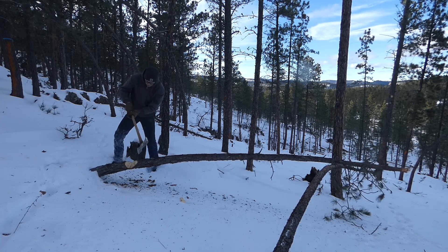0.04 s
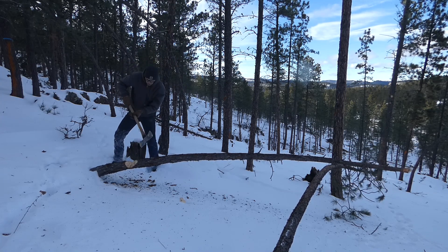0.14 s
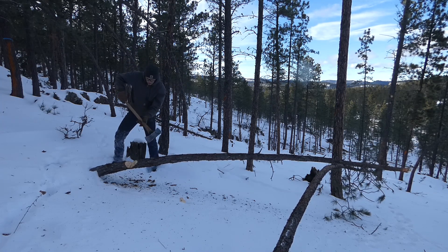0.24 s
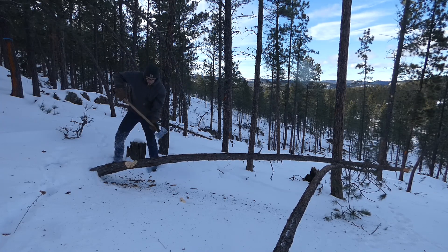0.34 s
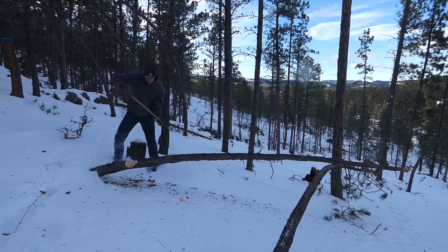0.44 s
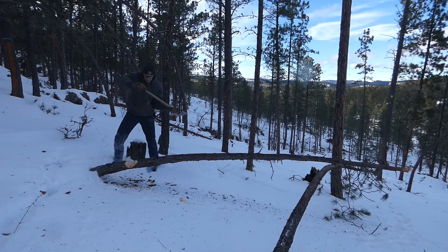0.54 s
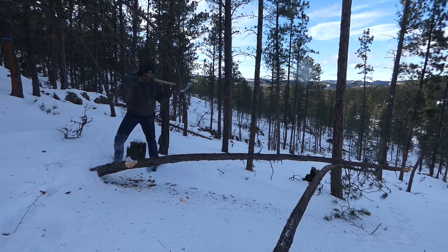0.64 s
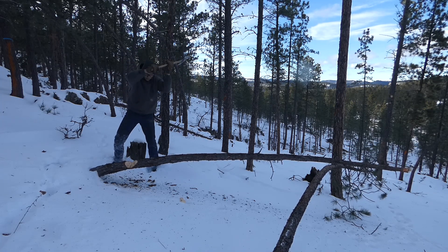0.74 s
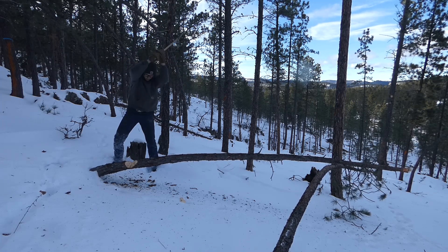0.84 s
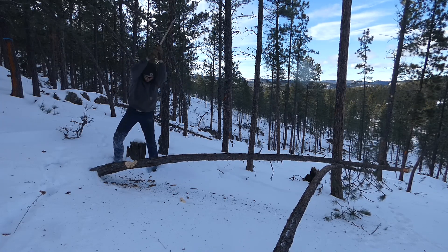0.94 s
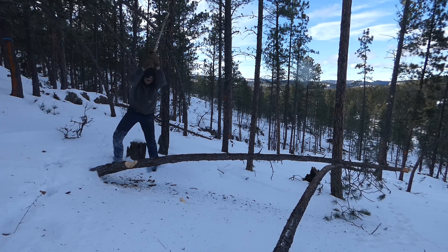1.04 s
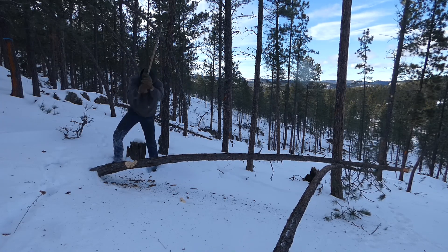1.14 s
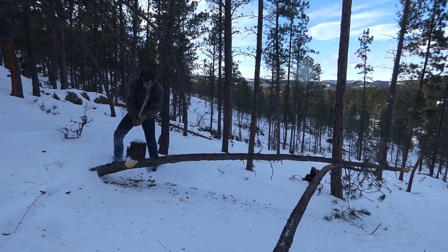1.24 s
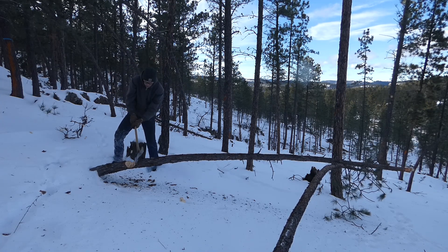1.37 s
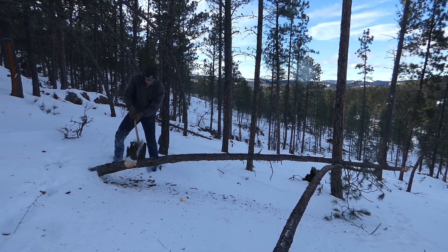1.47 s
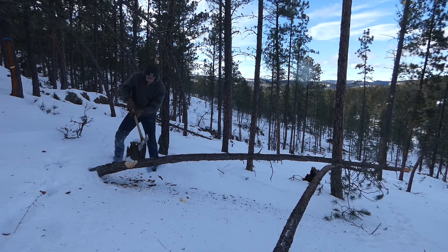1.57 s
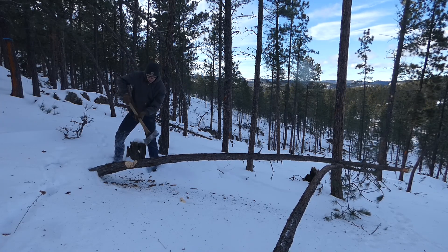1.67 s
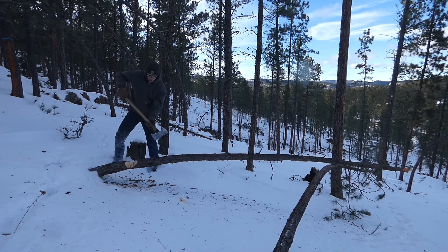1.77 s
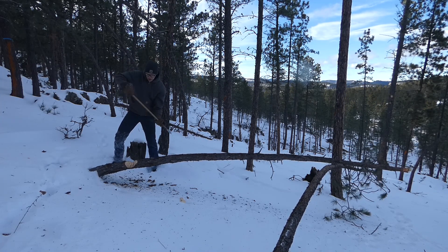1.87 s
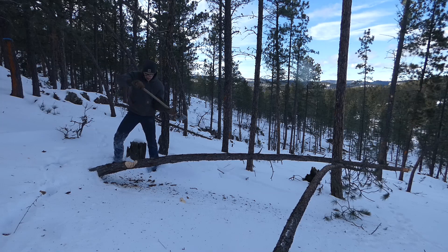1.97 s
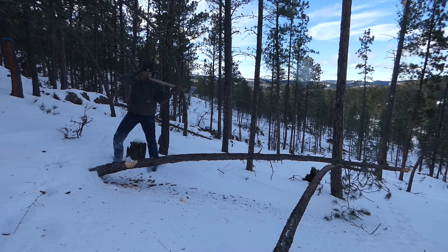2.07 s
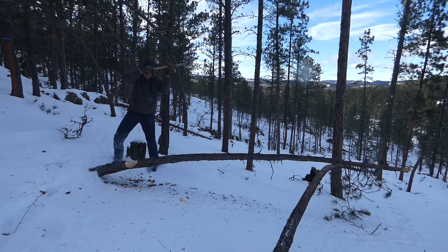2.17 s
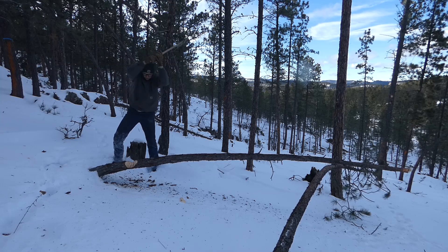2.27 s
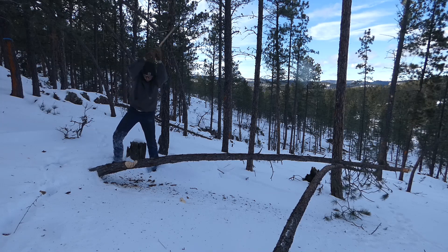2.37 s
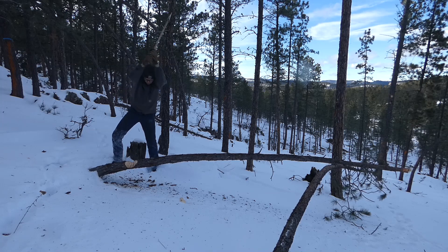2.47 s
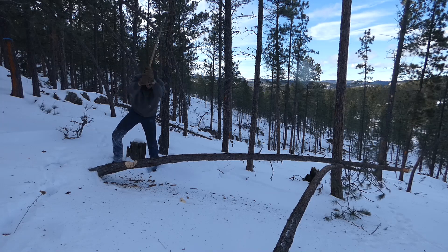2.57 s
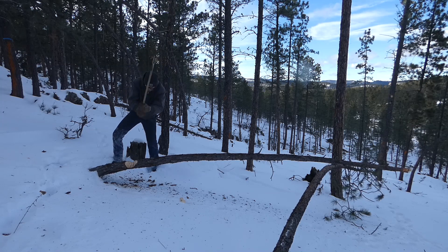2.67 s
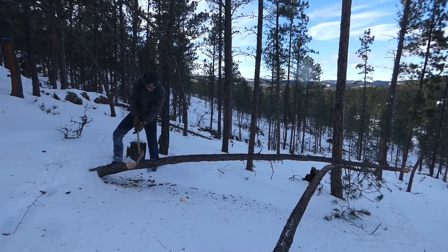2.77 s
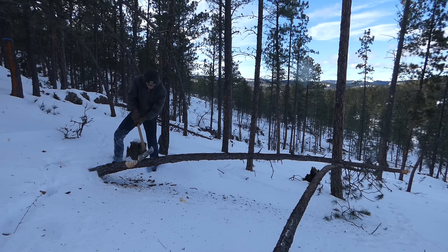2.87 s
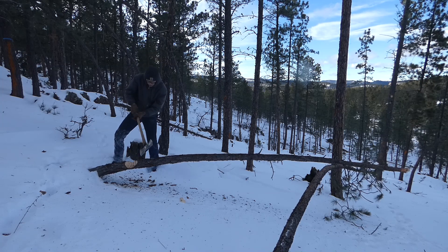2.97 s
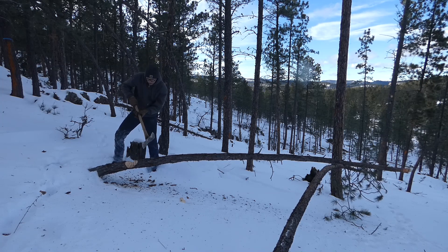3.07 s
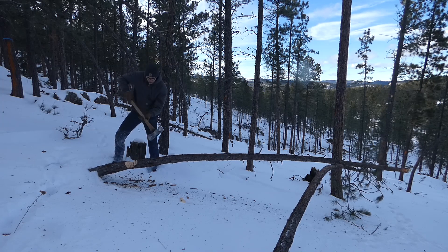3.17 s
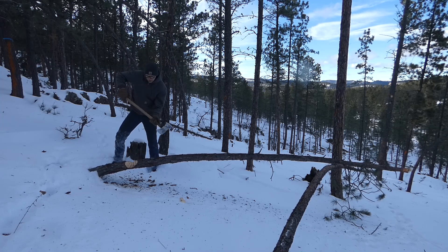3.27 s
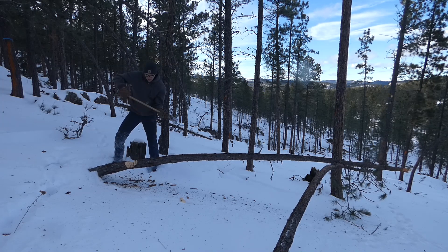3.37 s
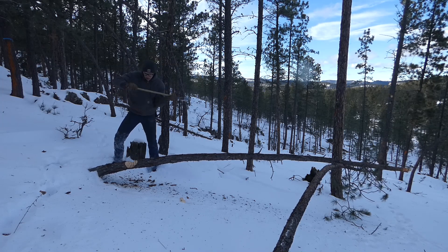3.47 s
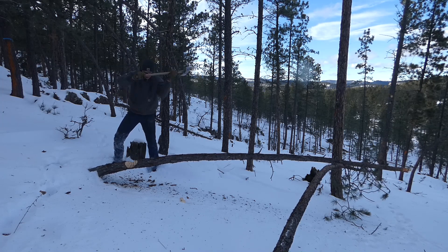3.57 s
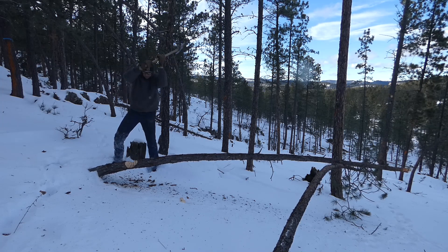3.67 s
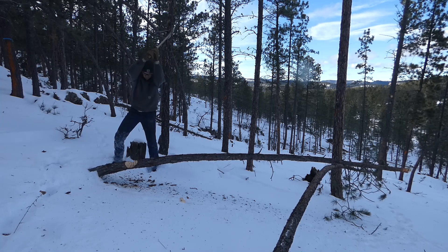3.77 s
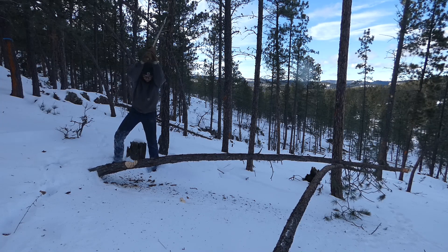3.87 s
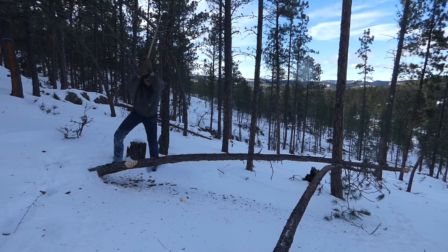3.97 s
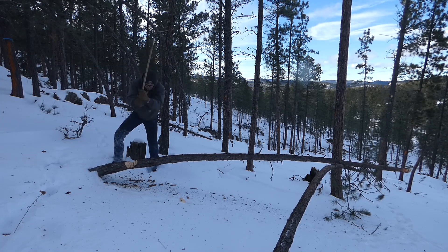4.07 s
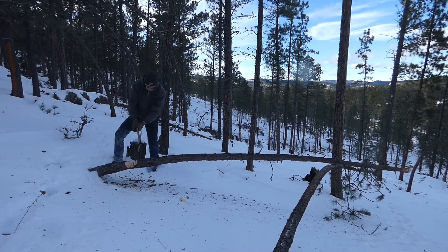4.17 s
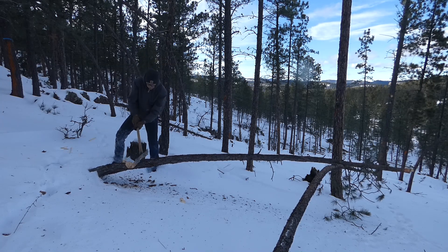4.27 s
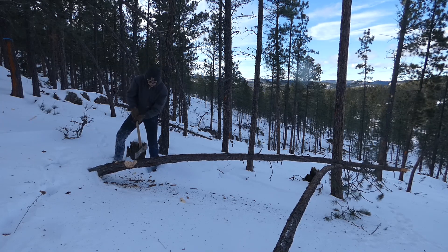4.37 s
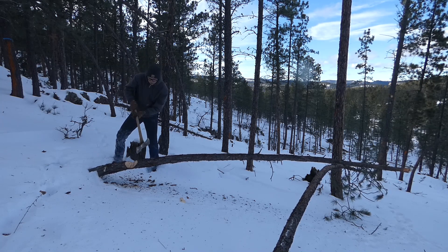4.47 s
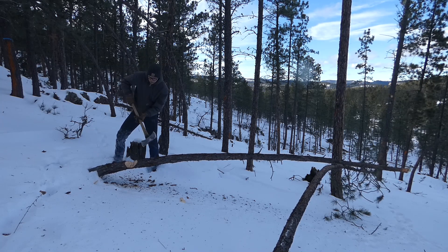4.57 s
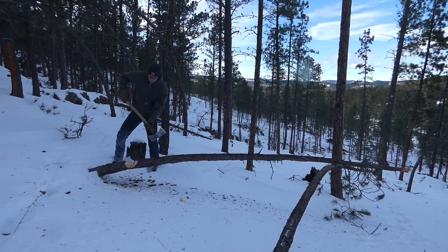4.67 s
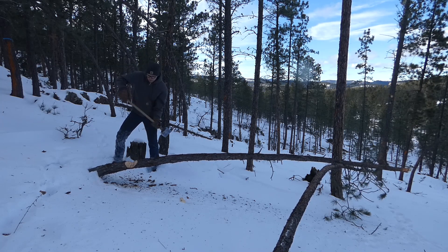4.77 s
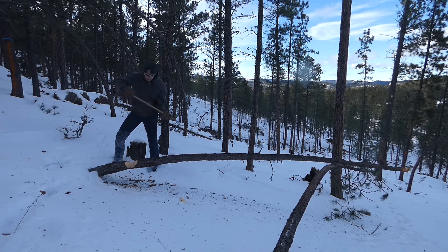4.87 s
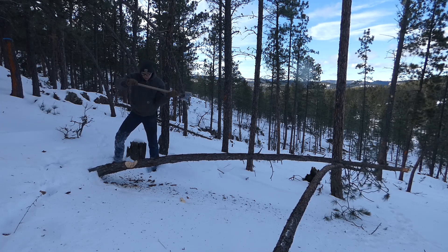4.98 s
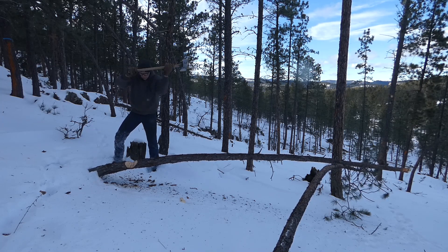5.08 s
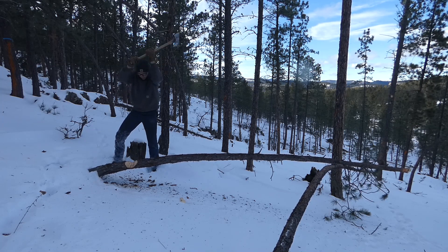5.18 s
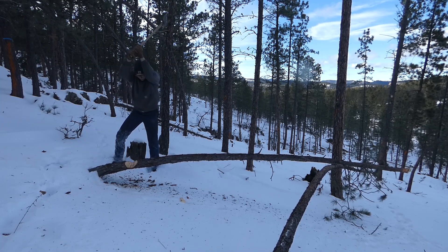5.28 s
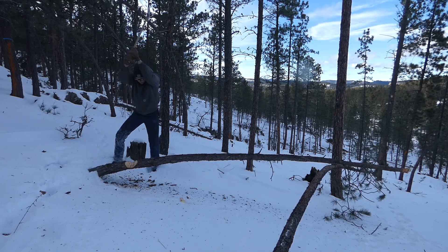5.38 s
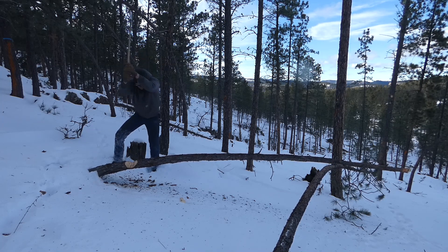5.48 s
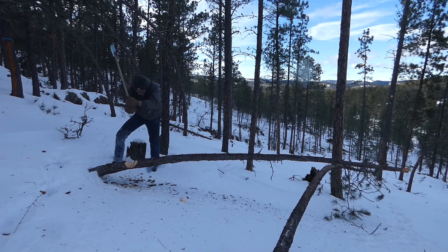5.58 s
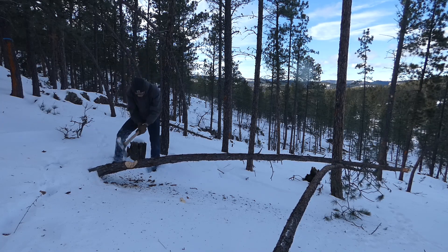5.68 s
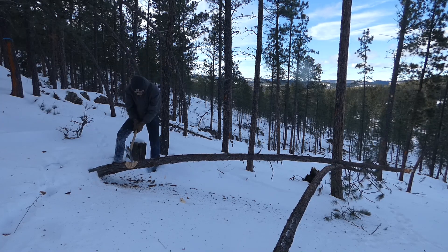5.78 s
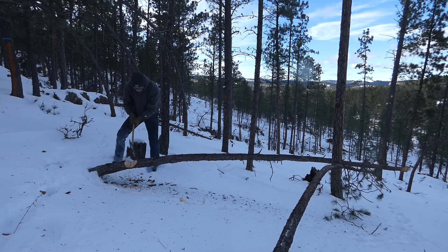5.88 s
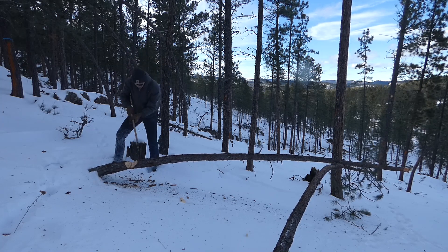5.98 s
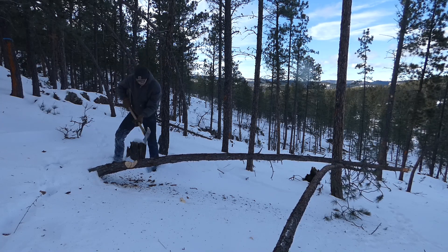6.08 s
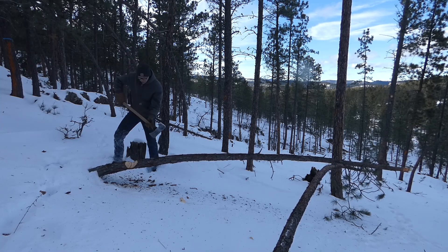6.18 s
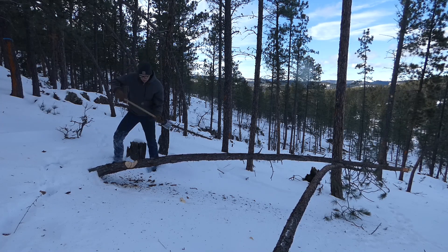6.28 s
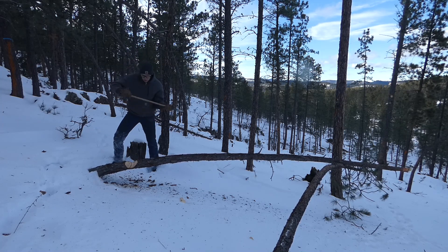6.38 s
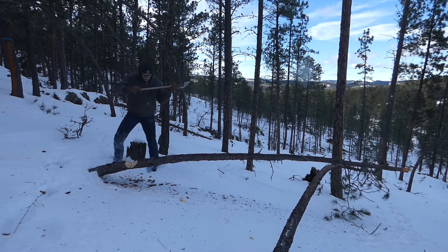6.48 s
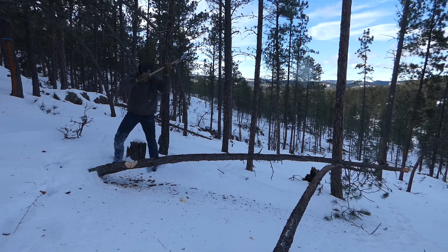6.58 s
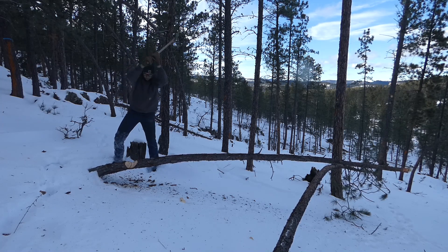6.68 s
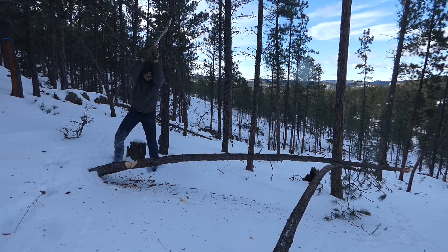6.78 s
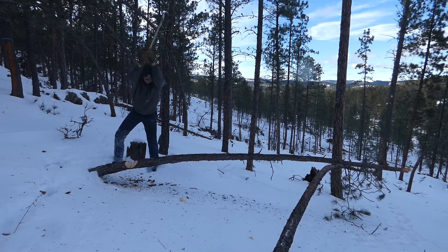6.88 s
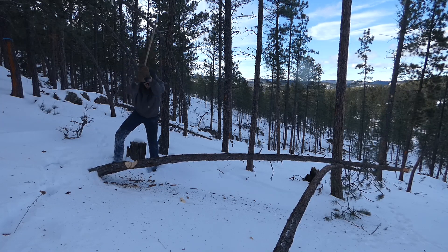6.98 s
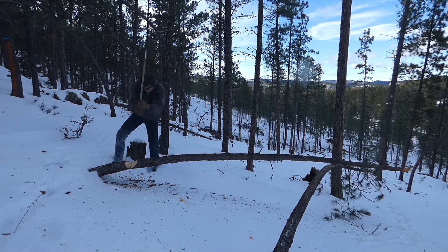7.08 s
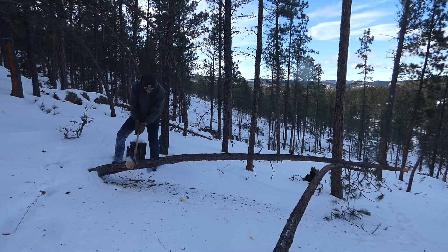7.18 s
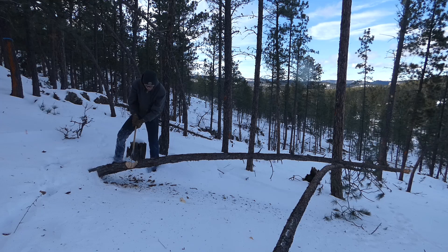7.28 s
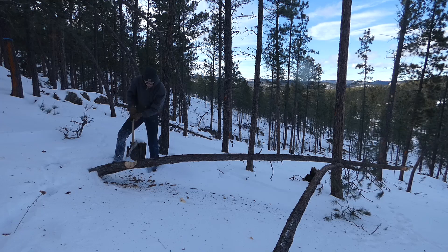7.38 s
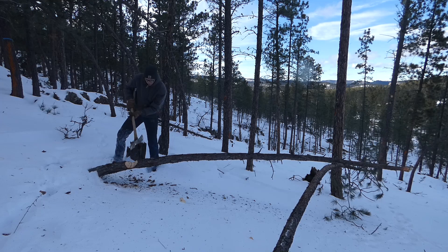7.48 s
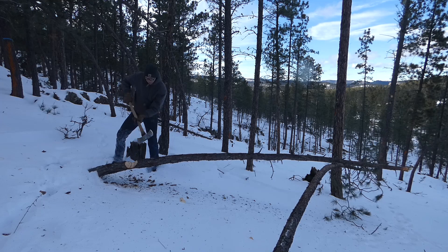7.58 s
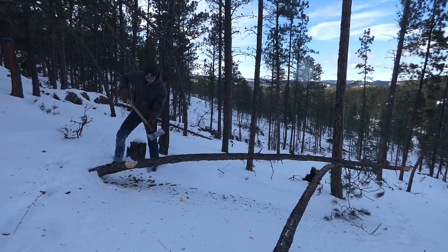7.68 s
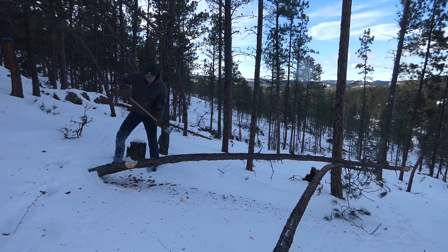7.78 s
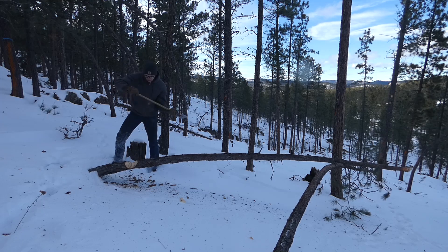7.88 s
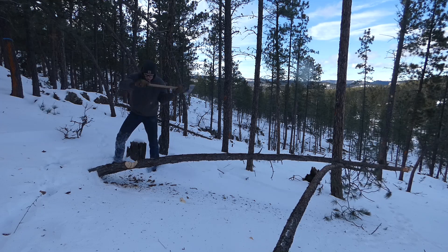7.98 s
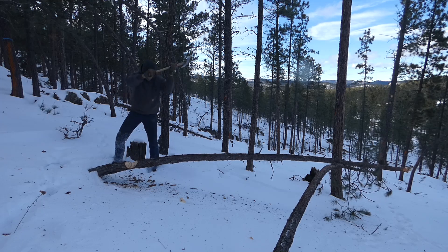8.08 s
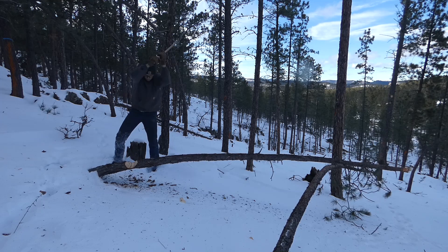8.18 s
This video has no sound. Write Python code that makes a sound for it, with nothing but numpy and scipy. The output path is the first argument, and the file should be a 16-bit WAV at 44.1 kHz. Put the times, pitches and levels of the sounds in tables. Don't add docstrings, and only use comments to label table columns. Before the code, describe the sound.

Five sharp axe blows crack into a fallen trunk at a steady pace, with falling chirps, forest echoes, cloth rustle and soft wind.

```python
import sys
import numpy as np
from scipy import signal
from scipy.fft import rfft, irfft
from scipy.io import wavfile
from scipy.ndimage import uniform_filter1d

SR = 44100
rng = np.random.default_rng(int(sys.argv[2]) if len(sys.argv) > 2 else 0)


def attenuation_scalar(level_db):
    decades = np.asarray(level_db, float) / 20
    return 10 ** decades


def unload_audio(sound):
    columns = np.transpose(np.atleast_2d(sound))
    steps = np.round(np.clip(columns, -1, 1) * 32767)
    wavfile.write(sys.argv[1], SR, steps.astype(np.int16))


N = 362943
T = np.arange(2048) / SR
STEP = 40
STEPS = np.arange(0, N + STEP, STEP) / SR
OPPOSED = np.array([[1], [-1]])

# (time [s], knock peak [dB], knock pitch [Hz], knock decay by 60 dB [ms], first tick [dB])
BITES = [
    (1.3760, 0.5, 806, 9.3, -3.5),
    (2.843, 4, 940, 4.7, -1.5),
    (4.2740, 5, 990, 7.5, 0.5),
    (5.7715, -7.5, 710, 6.1, -1.5),
    (7.2614, 1, 890, 5, -0.5),
]
# (near echoes [dB], far scatter [dB], swell [s], woody rattle [dB], shudder [dB])
AFTERMATH = [
    (-25, -33.5, 0.047, -14.5, -33.5),
    (-26, -35.5, 0.018, -15.5, -30.5),
    (-24, -35.5, 0.037, -24, -33.5),
    (-33, -42, 0.011, -8.5, -25.5),
    (-27, -38.5, 0.029, -12.5, -30.5),
]
# (pitch [Hz], width [Hz], boost [dB])
CUT_RINGS = [
    [(2150, 800, 6), (3550, 1200, 9), (5550, 600, 7)],
    [(2800, 700, 3), (4230, 400, 12), (5400, 900, 3)],
    [(2700, 130, 8), (4080, 600, 6), (5400, 900, 8)],
    [(1600, 500, 4), (4300, 900, 3), (9900, 1500, 4)],
    [(2400, 900, 4), (3200, 700, 4), (9500, 1500, 3)],
]
# (frequency [Hz], density [dB per Hz])
SPLINTER_COLOUR = [(710, -11.5), (1200, -19), (1680, -15), (3500, -15), (4220, -9.5), (4970, -16),
                   (5610, -12), (8220, -16.5), (10000, -10.5), (15000, -29), (16400, -25)]


def rms_one(x):
    return x / np.sqrt(np.mean(x ** 2) + 1e-20)


def at_hz(points, hz):
    table = np.array(points)
    return np.interp(np.log(hz), np.log(table[:, 0]), table[:, 1])


def smooth(steps, size=N):
    return np.interp(np.arange(size) / STEP, np.arange(len(steps)), steps)


def drift(rate, size=N):
    r = np.exp(-2 * STEP * np.pi * rate / SR)
    noise = rng.standard_normal(size // STEP + 2002)
    slow = signal.lfilter([1], [1, -2 * r, r * r], noise)[2000:]
    return smooth(rms_one(slow), size)


def ring(x, hz, t60):
    r, w = attenuation_scalar(-60 / (t60 * SR)), 2 * np.pi * hz / SR
    return signal.lfilter([0, np.sin(w)], [1, -2 * r * np.cos(w), r * r], x + 1e-18)


def low_cut(x, order, hz):
    return signal.sosfilt(signal.butter(order, hz, "high", fs=SR, output="sos"), x)


def resonate(x, rings):
    out = x
    for hz, width_hz, db in rings:
        r = np.exp(-1.5 * np.pi * width_hz / SR)
        b = np.array([1, 0, -1]) * (1 - r * r) / 2
        a = [1, -2 * r * np.cos(2 * np.pi * hz / SR), r * r]
        twice = signal.lfilter(b, a, signal.lfilter(b, a, x))
        out = out + (attenuation_scalar(db) - 1) * twice
    return out


def colour(x, spectrum):
    hz = np.maximum(np.arange(1025) * SR / 2048, 20)
    cepstrum = irfft(np.log(attenuation_scalar(at_hz(spectrum, hz))))
    cepstrum[1:1024] *= 2
    cepstrum[1025:] = 0
    return irfft(rfft(x, 2048) * np.exp(rfft(cepstrum)))


def bands(size, first):
    # (frequency [Hz], likeness [-1 to 1])
    likeness = [(60, -2.6), (130, -0.22), (290, 0.8), (640, 0.66), (1410, 0.71), (3100, 0.7), (6820, 0.78),
                (15000, 0.58)]
    # (frequency [Hz], left minus right [dB])
    lean = [(60, 1), (150, 2.5), (380, 4.5), (950, 5), (2380, 4), (5980, 0.5), (15000, 1.5)]
    edges = 25 * 2 ** np.arange(0, 9.7, 1 / 3)
    white = rng.standard_normal((2, 2, size))
    for k, (low, high) in enumerate(zip(edges[first:-1], edges[first + 1:-1])):
        band_pass = signal.butter(2, [low, high], "band", fs=SR, output="sos")
        mid, side = signal.sosfilt(band_pass, white[k % 2])
        hz = np.sqrt(low * high)
        alike = np.clip(at_hz(likeness, hz), -1, 1)
        pair = np.sqrt(1 + alike) * mid + np.sqrt(1 - alike) * side * OPPOSED
        yield hz, pair * attenuation_scalar(at_hz(lean, hz) / 2 * OPPOSED)


def add(out, s, sound):
    at = round(s * SR)
    sound, at = sound[..., max(-at, 0):], max(at, 0)
    out[:, at:at + sound.shape[-1]] += sound[..., :N - at]


def rubbing():
    # (start [s], length [s], level [dB])
    sweeps = [(-.1, 0.19, -60), (.1, 0.33, -60.5), (0.614, .28, -61), (1.24, .16, -62), (1.55, 0.33, -60.5),
              (2.1, 0.25, -62.5), (2.7, 0.27, -62), (3.0, 0.32, -60), (3.52, 0.29, -62.5),
              (4.13, 0.31, -63), (4.45, 0.31, -59.5), (5.02, 0.29, -64), (5.64, 0.28, -61.5),
              (5.98, 0.32, -61.5), (6.5, 0.28, -63), (7.1, 0.41, -61.5), (7.5, 0.29, -62.5),
              (8.0, 0.23, -61)]
    rise_s, fall_s, growth_db, rest_db = 0.072, 0.038, 0.5, -73
    power = attenuation_scalar(rest_db) ** 2
    for s, length, db in sweeps:
        since = STEPS - s
        shape = np.clip(since / rise_s, 0, 1) * np.exp(-np.maximum(since - length, 0) / fall_s)
        growth = growth_db * np.clip(since / length - 0.5, -1, 1)
        power = power + (shape * attenuation_scalar(db + growth)) ** 2
    return smooth(np.sqrt(power))


def wind_and_cloth():
    # (time [s], level [dB])
    strength = [(0.0, -47), (0.37, -45), (1.51, -45.5), (1.97, -45), (2.86, -47.5), (3.0, -46),
                (4.56, -46.5), (4.7, -45.5), (5.52, -47.5), (5.91, -43.5), (6.19, -46.5), (7.01, -47),
                (7.17, -46.5), (7.47, -48), (8.23, -46)]
    # (frequency [Hz], density [dB per Hz])
    pines = [(65, -51), (110, -14.5), (138, -12), (174, -7.5), (463, -1), (571, -1.5), (633, 0), (796, -4),
             (1260, -8), (1430, -12), (3640, -29.5), (8210, -45.5), (9310, -46), (16000, -49)]
    # (frequency [Hz], density [dB per Hz])
    fabric = [(880, -32.5), (1500, -5), (1660, 8), (1910, -11.5), (2930, -7.5), (4240, -9.5), (4740, -6.5),
              (6660, -6.5), (7890, -11.5), (9930, -6), (15000, -21.5), (15700, -32), (16400, -56.5)]
    wind, cloth, gust, rub = 0, 0, drift(4.4), drift(25)
    for hz, band in bands(N, first=7):
        if hz > 120:
            wind = wind + band * attenuation_scalar(at_hz(pines, hz) + 0.22 * gust + 1.5 * drift(7.5))
        if hz > 1400:
            other = np.roll(band, N // 2, axis=1)
            cloth = cloth + other * attenuation_scalar(at_hz(fabric, hz) + 1.4 * rub + 0.61 * drift(9.3))
    cloth = resonate(cloth, [(10020, 1700, 3.1)])
    wind_gain = attenuation_scalar(np.interp(np.arange(N) / SR, *np.transpose(strength)))
    return wind_gain * attenuation_scalar(0.5) * rms_one(wind) + rubbing() * attenuation_scalar(5.5) * rms_one(cloth)


def puffing():
    # (time [s], peak [dB], length [s])
    puffs = [(0.0, -50, 0.035), (0.117, -57, .06), (1.16, -70, .04), (.43, -61, 0.025), (.546, -72, .03),
             (.68, -63, 0.037), (0.885, -60, .035), (1.03, -72, .04), (1.885, -58, .03), (2.32, -72, 0.058),
             (2.68, -76, .05), (3.28, -70, 0.034), (3.6, -72.5, .03), (3.79, -71, .06), (4.93, -72, 0.062),
             (5.318, -79, 0.056), (6.43, -79, .06), (6.78, -78.5, 0.048), (7.824, -57, 0.04),
             (8.052, -70.5, .04)]
    shake_delay_s, shake_db, shake_fade_s = 0.27, -63, 0.058
    gain = 0
    for s, db, length in puffs:
        gain = gain + attenuation_scalar(db) * np.exp(-((STEPS - s) / length) ** 2)
    for s, *_ in BITES:
        late = (STEPS - s - shake_delay_s) / shake_fade_s
        gain = gain + attenuation_scalar(shake_db) * (STEPS > s) * np.exp(-np.abs(late))
    return smooth(gain)


def ports():
    low_band = signal.butter(1, [55, 120], "band", fs=SR, output="sos")
    dull = signal.butter(2, 125, fs=SR, output="sos")
    rumble = signal.sosfilt(low_band, rng.standard_normal((2, N)))
    mid, side = signal.sosfilt(dull, rumble)
    gain = puffing() * attenuation_scalar(-0.5) + attenuation_scalar(-79)
    return gain * (rms_one(mid) + 1.3 * rms_one(side) * OPPOSED)


def forest():
    # (frequency [Hz], density [dB per Hz])
    scatter = [(300, -7.5), (900, -2.5), (2000, -10), (4000, -9.5), (6000, -9.5), (8000, -13), (10000, -11),
               (15000, -38)]
    # (frequency [Hz], decay by 60 dB [s])
    scatter_t60 = [(300, 0.13), (1000, 0.69), (3000, 0.74), (6000, 0.54), (12000, 0.45)]
    earlier_s, earlier_db = -0.09, -13.5
    stand_s, stand_spread_s, stand_db = 0.21, 0.035, 2.5
    times = [s for s, *_ in BITES] + [earlier_s]
    after = AFTERMATH + [np.add(AFTERMATH[0], [0, earlier_db, 0, 0, 0])]
    out, t = np.zeros((2, N)), np.arange(SR * 3 // 4) / SR
    size = len(t)
    onset = np.clip(t / 0.004, 0, 1)
    near = onset * np.exp(-t / 0.025)
    stand = stand_db * np.exp(-((t - stand_s) / stand_spread_s) ** 2)
    for s, (near_db, far_db, swell_s, rattle_db, _), rings in zip(times, after, CUT_RINGS + CUT_RINGS[:1]):
        tail, wood = 0, 0
        for hz, band in bands(size, first=9):
            if hz > 200:
                fade_db = at_hz(scatter, hz) - 60 * t / at_hz(scatter_t60, hz)
                tail = tail + band * attenuation_scalar(fade_db + 2.0 * drift(35, size))
                wood = wood + band * attenuation_scalar(-9 * np.log2(hz / 900) ** 2)
        far = attenuation_scalar(far_db + 15 + stand) * (1 - np.exp(-t / np.maximum(swell_s, 0.005)))
        patches = attenuation_scalar(0.92 * drift(25, size))
        add(out, s, tail * near * attenuation_scalar(near_db + 10.5) + resonate(tail, rings) * far * patches)
        add(out, s, rms_one(wood) * onset * attenuation_scalar(rattle_db) * np.exp(-t / 0.0096))
    return out


def snaps():
    # (time [s], peak [dB], tilt [dB per octave], decay [ms])
    events = [(.504, -41.5, 3, 0.77), (1.1393, -40.5, -6, 3), (1.3864, -14, -24, 1.3),
              (2.884, -15.5, -5, 1), (3.81, -34.5, -6.5, 2), (4.699, -37, -7.5, 0.73),
              (5.443, -42, -5, 0.48), (5.794, -17, -4, 1.2), (6.1639, -36, 10, 0.65), (6.7787, -39, 7, .6),
              (7.0183, -25, 6.5, 0.33), (7.2665, -3, -1.5, 1.5), (7.2714, -19, 4, 1),
              (7.3396, -7, 5.5, 0.17)]
    out = np.zeros((2, N))
    for s, db, tilt_db, ms in events:
        puff = rng.standard_normal(len(T)) * np.exp(-T / ms * 1000)
        tilted = [(hz, d + tilt_db * np.log2(hz / 4000)) for hz, d in [(300, -53.5)] + SPLINTER_COLOUR]
        puff = colour(puff, tilted)
        add(out, s + 0.0005, attenuation_scalar(db) * puff / np.abs(puff).max())
    return out


def chips():
    # (time [s], peak [dB], pitch [Hz])
    drops = [
        (0.737, -51, 288),
        (2.178, -47.5, 415),
        (3.608, -44, 367),
    ]
    out, t = np.zeros((2, N)), np.arange(SR // 4) / SR
    for s, db, hz in drops:
        swell_and_fade = (t / 0.0035) * np.exp(1 - t / 0.0066)
        add(out, s, attenuation_scalar(db) * np.sin(2 * np.pi * hz * t) * swell_and_fade)
    return out


def crack(tick_db, split, rings):
    start, length, split_db, bright_db = split
    ms = T * 1000
    burst = np.exp(-((ms - start - length / 2) / length * 2) ** 4)
    burst = burst + 0.049 * (ms > start) * np.exp(-ms / 8.4)
    gate = attenuation_scalar(split_db) * burst + attenuation_scalar(tick_db) * np.exp(-ms / 1.0)
    fibres = rng.standard_normal((2, len(T))) * attenuation_scalar(0.36 * rng.standard_normal(len(T)))
    tilted = [(hz, d + bright_db * (hz > 7000)) for hz, d in SPLINTER_COLOUR]
    sound = colour((fibres[0] + 0.13 * fibres[1] * OPPOSED) * gate, tilted)
    sound = resonate(sound, np.multiply(rings, [1, 1.5, 0.3]))
    return sound / np.abs(sound).max() * gate.max()


def knock(db, hz, decay_ms):
    push = np.exp(-((T * 1000 - 0.5) / 0.1) ** 2)
    sound = ring(push, hz, decay_ms / 1000)
    sound = sound + 0.037 * ring(push, 320, 0.0024) + 0.16 * ring(push, hz * 1.1, 0.013)
    return attenuation_scalar(db) * sound / np.abs(sound).max()


def blows():
    # (start [ms], length [ms], peak [dB], brightness above 7 kHz [dB])
    splits = [
        (2.22, 0.96, 3.5, -9.5),
        (0.45, 1.5, -2, -4),
        (2.2, 2.02, 2, -7.5),
        (0.11, 2.8, -1, -6.5),
        (0.85, 2.8, -13, -4.5),
    ]
    out = np.zeros((2, N))
    for (s, db, hz, decay_ms, tick_db), split, rings in zip(BITES, splits, CUT_RINGS):
        both = attenuation_scalar([[1.4], [-1.4]]) * crack(tick_db, split, rings)
        both = both + attenuation_scalar([[1.0], [-2.4]]) * knock(db, hz, decay_ms)
        add(out, s, low_cut(both, 2, 190))
    return out


def returning_wave():
    # (time [s], peak [dB])
    returns = [
        (1.407, -21),
        (1.445, -28),
        (2.872, -14.5),
        (2.91, -30.5),
        (4.304, -19.5),
        (4.341, -43),
        (5.8064, -11.5),
        (5.842, -15),
        (7.2959, -18),
        (7.3312, -23.5),
    ]
    out = np.zeros((2, N))
    phase = 2 * np.pi * 1750 * 0.001127 * np.log(1 + T / 0.00124)
    chirp = np.cos(phase) * (1 - np.exp(-T / 0.001)) ** 2 * np.exp(-(T / 0.0062) ** 3)
    chirp = low_cut(chirp, 2, 130)
    for s, db in returns:
        grain = attenuation_scalar(4 * uniform_filter1d(rng.standard_normal((2, len(T))), size=30))
        add(out, s, attenuation_scalar(db + OPPOSED) * grain * chirp / np.abs(chirp).max())
    return out


def shudder():
    # (pitch [Hz], level [dB], decay by 60 dB [s])
    tones = [(84, -6, .1), (100, -5, .08), (118, -5, .06), (137, -5, .06), (180, -4, .045), (268, -3, .045),
             (350, -9, .035)]
    out, shake = np.zeros((2, N)), np.zeros(N)
    t = np.arange(SR // 2) / SR
    for (s, *_), (*_, shudder_db) in zip(BITES, AFTERMATH):
        shake[round(s * SR):][:len(t)] += attenuation_scalar(shudder_db) * (t / 0.018) * np.exp(-t / 0.03)
    jolts = shake * attenuation_scalar(4.9 * drift(45))
    for hz, db, t60 in tones:
        mid, side = ring(jolts * rng.standard_normal((2, N)), hz, t60)
        out += attenuation_scalar(db - 18.0) * (mid + 0.45 * side * OPPOSED)
    return out


def trunk():
    return low_cut(returning_wave() + shudder(), 4, 95)


def scene():
    return blows() + trunk() + forest() + snaps() + chips() + wind_and_cloth() + ports()


def band_limit(x):
    return signal.sosfilt(signal.butter(12, 16520, fs=SR, output="sos"), x)


def record(dry):
    slope = 22 * np.arange(N) / SR
    peak_db = 20 * np.log10(np.abs(dry).max(axis=0) + 1e-9)
    over_db = np.maximum(peak_db + 12, 0) * 0.37
    held_db = np.maximum.accumulate(over_db + slope) - slope
    dip_db = signal.lfilter([0.004], [1, -0.996], held_db)
    wet = np.clip(dry * attenuation_scalar(-dip_db), -0.92, 0.92)
    top_cut = signal.cheby2(10, 70, 16900, fs=SR, output="sos")
    return band_limit(signal.sosfilt(top_cut, low_cut(wet, 1, 70)))


dry = scene()
out = record(dry)
unload_audio(out)
```